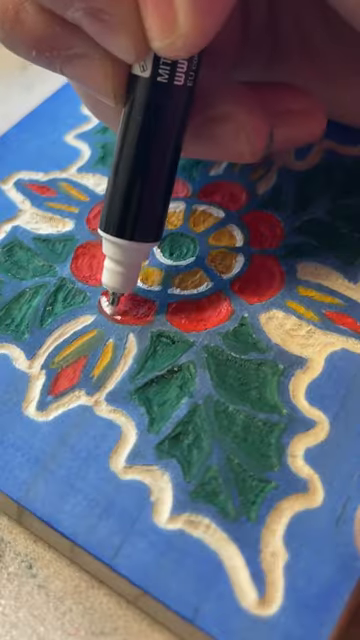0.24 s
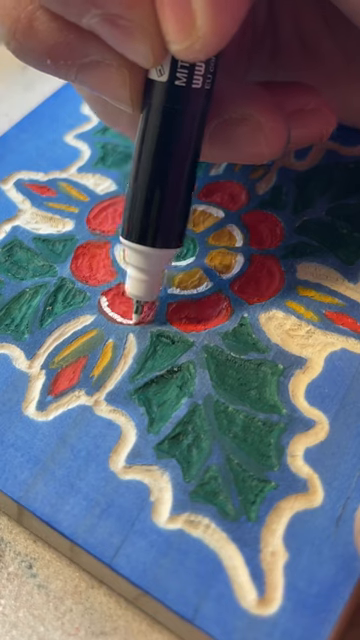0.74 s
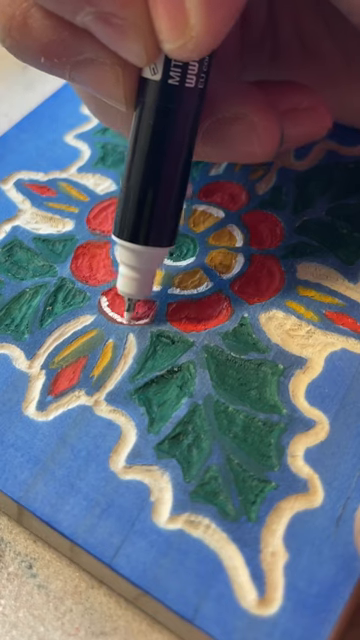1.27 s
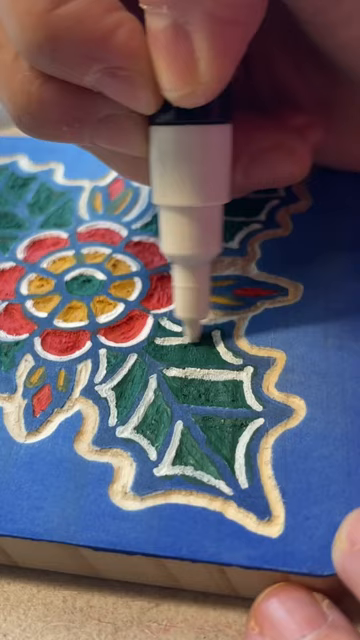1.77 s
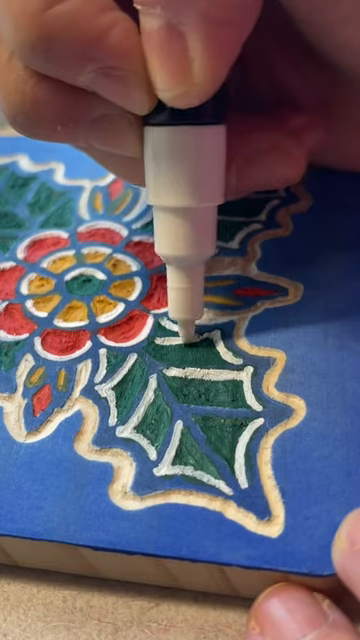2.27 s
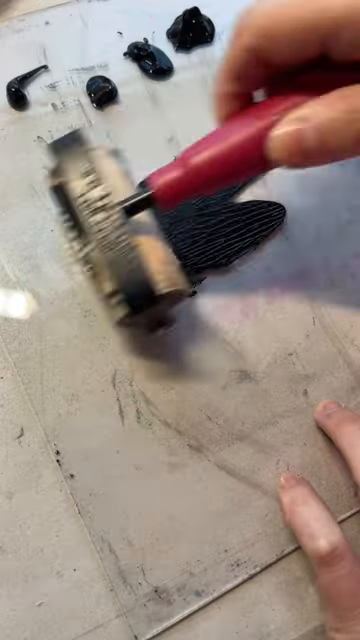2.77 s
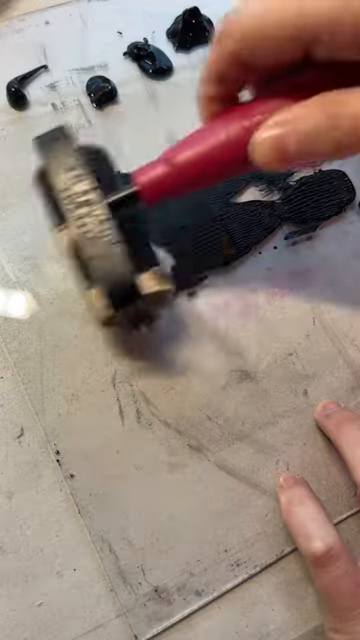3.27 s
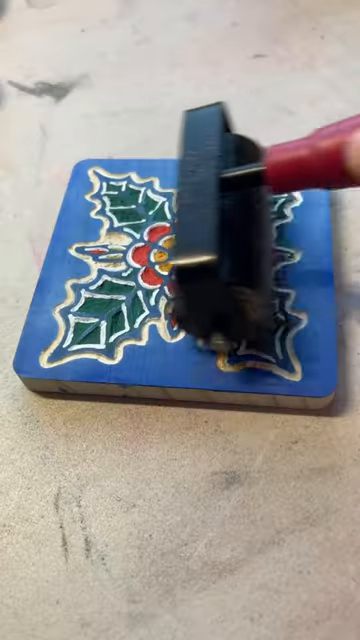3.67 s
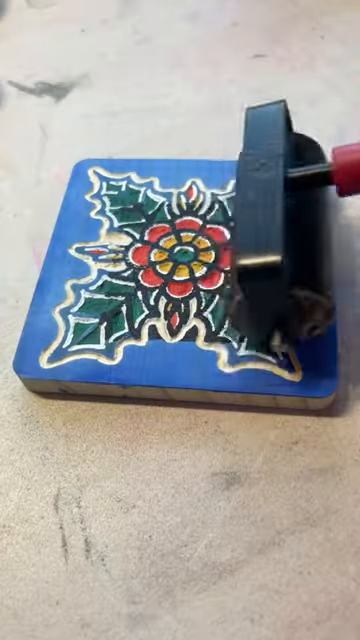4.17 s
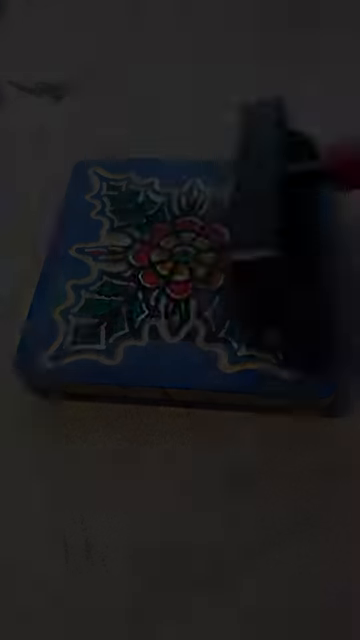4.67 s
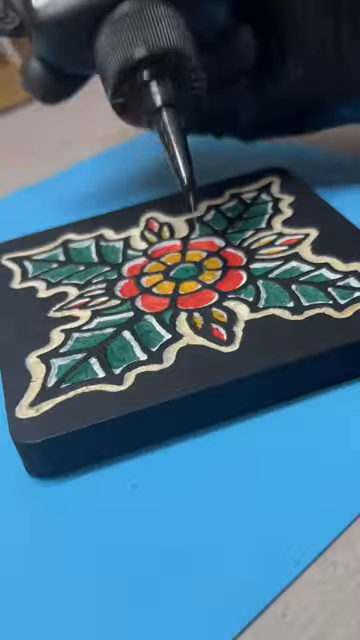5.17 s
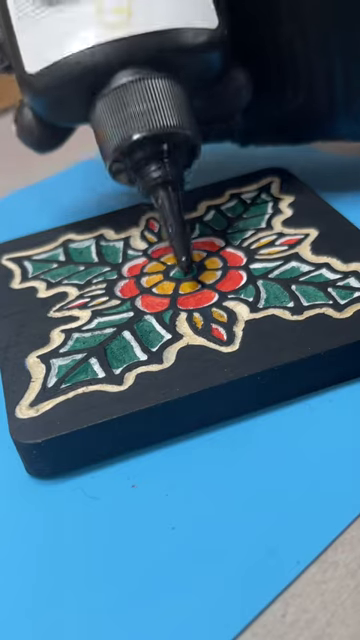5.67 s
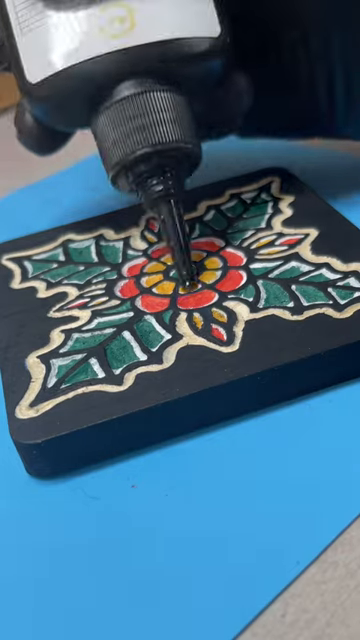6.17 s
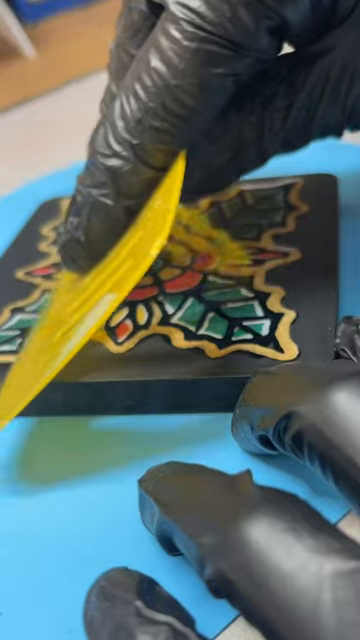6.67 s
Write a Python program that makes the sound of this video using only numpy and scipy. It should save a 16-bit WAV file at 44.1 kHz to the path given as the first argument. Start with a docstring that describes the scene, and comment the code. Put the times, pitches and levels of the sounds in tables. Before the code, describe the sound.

A pen nib ticks and scrapes on carved wood, a roller crackles through tacky ink and drums to and fro, then cloth rubs wood.

```python
"""A paint pen ticks and scrapes in the grooves of a carved wooden block, over a low indoor rumble.
Then a rubber roller crackles through tacky ink on a slab and rolls to and fro over the block, drumming on the wood.
A bottle nozzle taps the block and a cloth rubs it to the end. Noise grains shaped by spectra give the friction and
tearing; damped sines give the ringing wood, pen and ink. Two closely spaced microphone ports hear it all."""
import sys
import numpy as np
from scipy import signal
from scipy.fft import rfft, irfft
from scipy.io import wavfile
from scipy.ndimage import uniform_filter1d

SR = 44100
rng = np.random.default_rng(int(sys.argv[2]) if len(sys.argv) > 2 else 0)


def master(y):
    """Save y as 16-bit WAV."""
    cut = np.clip(np.atleast_2d(y).T, -1, 1)
    pcm = np.round(cut * 32767)  # scale
    wavfile.write(sys.argv[1], SR, pcm.astype(np.int16))


N = 305172
T = np.arange(N) / SR
FREQS = np.arange(N + 1) * SR / (2 * N)

# All levels below are relative: each source, the room and the ports apply gains of their own.
# background spectra before and after the switch: (frequency [Hz], level [dB])
EARLY_ROOM = [(20, -37.5), (48, 2.5), (75, -2.5), (115, -3), (200, -11), (310, -12), (550, -22),
              (1200, -31.5), (1500, -40.5), (2300, -40), (2800, -49), (3600, -52), (10500, -55),
              (13000, -67), (16000, -72)]
LATE_ROOM = [(20, -29.5), (48, 6.5), (90, 1.5), (135, -1.5), (230, -7.5), (340, -12.5), (550, -28),
             (900, -41), (1800, -45.5), (4000, -48.5), (10500, -46.5), (13000, -60.5), (16000, -66)]
# wavering hums before and after the switch: (frequency [Hz], level [dB])
EARLY_HUM = [(119.6, -58), (301, -61.5), (387, -73), (806, -80)]
LATE_HUM = [(66, -60), (137, -59.5), (205, -69), (335, -69.5)]
# how unlike the two ports hear the background: (frequency [Hz], side minus mid [dB])
ROOM_WIDTH = [(60, -22.5), (130, -23), (280, -5), (570, 4), (1200, 0.5), (2500, -9.5), (11000, -20)]
BACKGROUND_SWITCH_S = 2.805

# pen nib catching on ridges of the carving: (time [s], tick level [dB], thud level [dB])
NIB_TICKS = [(0.024, -46, -43), (0.0433, -40, -57), (0.115, -54, -65), (0.1995, -55.5, -45.5),
             (0.2399, -39.5, -47), (0.2443, -44, -46.5), (0.3104, -47, -46), (0.3281, -35.5, -50),
             (0.3595, -35, -53), (0.3903, -36, -55), (0.3955, -42.5, -46), (0.4334, -49, -49),
             (0.4427, -44, -61), (0.5202, -27.5, -39), (0.603, -42, -41), (1.238, -64, -71),
             (1.8075, -42.5, -46.5), (2.176, -33, -44.5), (2.1876, -38, -42.5), (2.2053, -43, -44),
             (2.2381, -33.5, -62), (2.2803, -40.5, -60), (2.2837, -34, -41.5), (2.3405, -48, -56),
             (2.5539, -40.5, -50)]
# pen nib dragging: (time [s], length [s], level [dB])
SCRAPES = [(1.805, 0.043, -57), (1.885, 0.028, -72), (1.98, 0.035, -74), (2.172, 0.021, -56.5),
           (2.195, 0.028, -66), (2.279, 0.017, -61), (2.318, 0.044, -59.5), (2.552, 0.045, -73.5)]
# spectra of the fine pen on the petals and the thicker one on the leaves: (frequency [Hz], level [dB])
FINE_PEN_COLOUR = [(700, -7), (1500, -20), (2500, -3.5), (3600, -4.5), (4300, -5), (7000, 2.5),
                   (8500, -1.5), (10700, 5), (11800, -25.5), (14000, -45)]
THICK_PEN_COLOUR = [(600, 2.5), (1400, -39), (2200, -1), (3400, -13), (4500, 1.5), (5200, -1.5),
                    (5900, -2.5), (8300, -5.5), (10900, -4), (11800, -34), (14000, -39)]
# hollow tock of the block under the nib: (frequency [Hz], level [dB])
TOCK_COLOUR = [(200, 1.5), (330, 3), (520, 2), (750, -7), (1100, -9.5), (2000, -26), (5000, -48)]
PEN_CHANGE_S = 1.79  # from petals to leaves
BARREL_HZ, BARREL_DECAY_S = 6060, 0.00041
HOLLOW_HZ, HOLLOW_DECAY_S, HOLLOW_DB = 260, 0.0034, -6.5  # the block's hollow note, relative to the thud
BASS_EDGE_HZ = 63  # the wood radiates little below this

# modes of the table under the slab and of the block on it: (frequency [Hz], level [dB], t60 [s])
TABLE_MODES = [(55.5, -17, 0.12), (114.7, 4.5, 0.3), (141.5, -2, 0.36), (178.4, -9, 0.24),
               (235, -10.5, 0.12), (318, -8, 0.45), (377, -12, 0.053), (473, -26.5, 0.094),
               (586, -38.5, 0.079)]
BLOCK_MODES = [(84, -8, 0.11), (117.6, 0, 0.27), (132.5, 2, 0.27), (177, -10.5, 0.27), (234, -21, 0.13),
               (304, -18.5, 0.24), (440, -23.5, 0.17), (646, -32, 0.18)]

# roller strokes, to and fro: (time [s], length [s], speeding up [s], slowing down [s],
# ink crackle level [dB], wood rumble level [dB])
STROKES = [(2.805, 0.23, 0.0046, 0.12, -61.5, -42.5), (3.08, 0.22, 0.065, 0.155, -57, -38.5),
           (3.3, 0.22, 0.11, 0.083, -57, -40), (3.52, 0.087, 0.08, 0.011, -53.5, -37.5),
           (3.58, 0.35, 0.18, 0.092, -64.5, -42.5), (3.935, 0.28, 0.15, 0.13, -62, -35.5),
           (4.21, 0.28, 0.11, 0.097, -59.5, -40), (4.49, 0.25, 0.12, 0.12, -57.5, -33.5)]
# abrupt low thump as the background switches, and the first knock as the rolling begins: (time [s], thump level
# [dB], thump decay [s], # thud level [dB], boom [Hz], ink squelch level [dB])
ROLLING_ONSET = (2.8055, -28, .005, -25.5, 102.5, -44.5)
# roller dropping over a ridge: (time [s], thud level [dB], boom [Hz])
BUMPS = [(3.194, -25, 122.7), (3.374, -25.5, 115), (3.585, -34.5, 119), (3.974, -33.5, 138),
         (4.058, -27, 123.5), (4.341, -26, 113.6), (4.537, -31, 140.7), (4.604, -24.5, 135.5)]
# larger ink threads snapping behind the roller: (time [s], level [dB], ring [Hz])
SNAPS = [(2.853, -41, 10760), (2.9565, -34.5, 3420), (3.1001, -38.5, 7050), (3.1259, -38, 11000),
         (3.1592, -36.5, 10600), (3.174, -40, 1570), (3.197, -41, 10640), (3.2883, -49.5, 10500),
         (3.357, -44.5, 10800), (3.545, -45.5, 6400), (3.5836, -40, 1810), (3.602, -42.5, 5780),
         (3.681, -35, 10500), (3.72, -33.5, 10200), (4.158, -44.5, 7000), (4.2971, -34.5, 10800),
         (4.3242, -29.5, 10840), (4.6243, -30.5, 10140)]
# spectra of ink crackle on slab and block, and of single snaps: (frequency [Hz], level [dB])
SLAB_COLOUR = [(600, -2.5), (1000, -19), (1600, -2.5), (2300, -3), (3000, -5.5), (4000, -9), (6500, -1),
               (9000, 2.5), (10500, 7.5), (11500, -2.5), (12500, -42), (15500, -16)]
BLOCK_COLOUR = [(600, -5.5), (1000, -23), (1800, -22.5), (2600, -17), (3800, -20), (6000, -13),
                (9000, -4.5), (10300, 2.5), (11300, -6), (12500, -45), (15500, -30)]
SNAP_COLOUR = [(700, -15), (1800, -18.5), (4000, -14.5), (7000, -11.5), (10500, -2), (11800, -13),
               (13000, -39), (15500, -24)]
BLOCK_START_S = 3.56  # the roller moves from slab to block
CRACKLE_POWER, RUMBLE_POWER = 1.9, 2.02  # amplitude grows with these powers of roller speed
CREEP = 0.057  # least speed within a stroke, as a share of full speed
THICK_INK_SPREAD_DB = 3.2  # spread of sizes among the threads on the slab
THICK_SNAP_S, THIN_SNAP_S = 0.0029, 0.00061  # thick ink on the slab lets go more slowly

# single sharp, dry click: (time [s], level [dB])
DRY_CLICK = (4.7385, -34)
# its spectrum: (frequency [Hz], level [dB])
CLICK_COLOUR = [(300, -7), (1200, -11), (6000, -26), (13000, -39)]

# bottle being squeezed, and the glove shifting on it: (time [s], length [s], level [dB])
SQUEEZES = [(4.795, 0.046, -74), (5.78, 0.042, -73.5)]
GRIPS = [(5.76, 0.14, -58.5)]
# nozzle tapping the block: (time [s], knock level [dB], click level [dB])
TAP = (6.147, -38.5, -36)
# spectrum of the nozzle's click: (frequency [Hz], level [dB])
NOZZLE_COLOUR = [(110, 7), (220, 4.5), (350, 6), (600, 2), (1000, -5), (1500, -29), (2200, -22),
                 (2800, -27), (4300, -10.5), (5800, -26), (7400, -18), (11000, -16), (13000, -68)]
# glove squeaking faintly on the bottle: (time [s], length [s], level [dB], start [Hz], rise [Hz/s])
SQUEAK = (5.25, 0.11, -83, 4350, 5000)

# spectrum of cloth on wood: (frequency [Hz], level [dB])
CLOTH_COLOUR = [(30, -40), (70, -7), (90, 5.5), (125, 7.5), (170, -3.5), (225, -9), (300, -2), (450, -13),
                (500, -9.5), (570, -20.5), (780, -24), (1000, -33), (1800, -36), (2300, -34), (3400, -43),
                (6500, -39.5), (10800, -38.5), (11800, -73), (15000, -94)]
# glove crinkling: (time [s], length [s], level [dB])
CRINKLES = [(6.728, 0.0089, -53)]
RUB_START_S, RUB_DB, RUB_ATTACK_S = 6.574, -37.7, 0.0055

# what the room gives back, most in the low and middle range: (frequency [Hz], level [dB])
ECHO_COLOUR = [(80, -30.5), (300, -7), (700, -2.5), (2200, -10.5), (6000, -15.5), (12000, -20)]
# how far the right port trails the left: (frequency [Hz], phase lag [rad])
PORT_PHASE = [(1800, 0.0), (3000, 1.0), (4000, 1.1), (4600, 2.1), (5200, 4.9), (5700, 6.1), (6400, 6.8),
              (8400, 9.0), (9400, 9.6), (11800, 12.4), (13800, 12.6), (15200, 15.5)]
TOP_HZ = 15800


def undb(db):
    """Definition of level: decibels to amplitude gain."""
    return 10 ** (np.asarray(db) / 20)


def gains(points):
    """Spectral envelope: points joined in dB over log frequency, falling steeply below the first."""
    hz, db = np.transpose(points)
    envelope = undb(np.interp(np.log(FREQS + 1), np.log(hz), db))
    return envelope * np.minimum(FREQS / hz[0] + 0.0061, 1) ** 2


def response(points, size=4096):
    """Minimum phase: folding the cepstrum gives a causal impulse response, here of unit energy."""
    cepstrum = irfft(np.log(gains(points)))
    cepstrum[1:N] *= 2
    cepstrum[N + 1:] = 0
    h = irfft(np.exp(rfft(cepstrum)))[:size]
    return h / np.linalg.norm(h)


def colour(x, points):
    """Source and filter: x excites a body with the given spectrum."""
    return signal.oaconvolve(x, response(points))[:N]


def steady(x, window_s):
    """Power normalisation: the running rms of x is held near 1."""
    power = np.abs(uniform_filter1d(x ** 2, int(window_s * SR) + 1))
    return x / np.sqrt(power + 1e-12)


def waver(hold_s):
    """Low-passed noise: a smooth random drift of spread 1 that changes about every hold_s."""
    noise = uniform_filter1d(rng.standard_normal(N), int(hold_s * SR) + 1)
    return steady(uniform_filter1d(noise, int(hold_s * SR / 2) + 1), 2.2)


def grains(per_s, spread_db):
    """Shot noise: randomly timed micro-clicks, many small and a few large."""
    size = undb(spread_db * np.minimum(rng.exponential(size=N), 6))
    happens = rng.random(N) < per_s / SR
    return steady(happens * size * rng.standard_normal(N), 0.018)


def swells(rows):
    """Amplitude modulation: half-sine gains for gestures (time [s], length [s], level [dB])."""
    return sum(undb(db) * np.sin(np.pi * np.clip((T - s) / length, 0, 1)) for s, length, db in rows)


def add(out, s, x):
    """Superposition: mix x into out at time s."""
    i = int(s * SR)
    out[i:i + len(x)] += x[:N - i]


def split(rows, s):
    """Order in time: the events before s and those from s on."""
    return [row for row in rows if row[0] < s], [row for row in rows if row[0] >= s]


def crack(db, decay_s, size=2048):
    """Stick-slip: one slip followed by exponentially dying micro-slips."""
    burst = rng.standard_normal(size) * np.exp(-T[:size] / decay_s)
    return undb(db) * burst * np.sqrt(decay_s * SR / 2) / np.linalg.norm(burst)


def clicks(rows, decay_s):
    """Impulsive excitation: a crack at each (time [s], level [dB])."""
    out = np.zeros(N)
    for s, db in rows:
        add(out, s, crack(db, decay_s))
    return out


def pings(rows, decay_s, size=2048):
    """Damped resonance: a brief swelling and dying sine at each (time [s], level [dB], pitch [Hz])."""
    t, out = T[:size], np.zeros(N)
    envelope = t / decay_s * np.exp(1 - t / decay_s)  # peaks at 1 after decay_s
    for s, db, hz in rows:
        add(out, s, undb(db) * envelope * np.sin(2 * np.pi * hz * t))
    return out


def ring(modes, size=16384):
    """Modal superposition: free ringing of wood after a push, peak 1."""
    t = T[:size]
    h = sum(undb(db) * np.sin(2 * np.pi * hz * t) * np.exp(-np.log(1000) * t / t60) for hz, db, t60 in modes)
    return h / np.abs(h).max()


def knocks(rows, modes):
    """Modal excitation: each blow (time [s], level [dB]) pushes the wood down and lets its modes ring."""
    out, h = np.zeros(N), ring(modes)
    for s, db in rows:
        add(out, s, -undb(db) * h)
    return out


def radiate(x):
    """Radiation efficiency: a small board gives off little deep bass."""
    return signal.sosfilt(signal.butter(2, BASS_EDGE_HZ, "high", fs=SR, output="sos"), x)


def soften(x, corner_hz):
    """Low-pass filtering, as by a soft contact: only the lower frequencies pass."""
    return signal.sosfilt(signal.butter(4, corner_hz, fs=SR, output="sos"), x)


def background(points, hums, level_db):
    """Spatial coherence: a rumble alike at both ports in the bass, diffuse above, with wavering hums."""
    mid = colour(rng.standard_normal(N), points)
    side = colour(rng.standard_normal(N), points)
    side = irfft(rfft(side, 2 * N) * gains(ROOM_WIDTH))[:N]
    rumble = undb(level_db) * np.array([undb(-1.0) * (mid + side), mid - side])
    hum = np.zeros(N)
    for hz, db in hums:
        strength = undb(db) * (1 + 0.7 * waver(0.034))
        hum += strength * np.sin(2 * np.pi * hz * T + 0.78 * waver(0.079))
    return rumble + hum


def pen(ticks, points, tick_db, ring_db, thud_db, tock_db, decay_s, drag=0):
    """Stick-slip over a ridge: a click and brief ring in the pen, a hollow tock in the block, a table thud."""
    s, db, thud = np.transpose(ticks)
    slips = clicks(zip(s, db + tick_db), decay_s) + drag
    barrel = pings([(when, level + ring_db, BARREL_HZ) for when, level in zip(s, db)], BARREL_DECAY_S)
    hollow = pings([(when, level + HOLLOW_DB, HOLLOW_HZ) for when, level in zip(s, thud)], HOLLOW_DECAY_S)
    tock = undb(tock_db) * colour(slips, TOCK_COLOUR) - hollow
    table = radiate(knocks(zip(s, thud + thud_db), TABLE_MODES))
    return colour(slips, points) + barrel + tock + table


def stroke(start_s, length_s, up_s, down_s):
    """Kinematics: roller speed from 0 to 1 as the hand eases into a stroke, holds its pace and eases out."""
    rise = np.sin(np.pi / 2 * np.clip((T - start_s) / up_s, 0, 1))
    fall = np.sin(np.pi / 2 * np.clip((start_s + length_s - T) / down_s, 0, 1))
    moving = (T > start_s) * (T < start_s + length_s)
    return (CREEP + (1 - CREEP) * rise * fall) * moving


def tearing(strokes):
    """Power law of speed: the faster the roller, the harder the ink is torn."""
    return sum(undb(db) * stroke(*motion) ** CRACKLE_POWER for *motion, db, _ in strokes)


def roller(strokes, points, modes, per_s, spread_db, patchy_db, ink_db, rumble_db, rubber_hz):
    """Adhesive rupture and forced vibration: ink tears in patches, uneven rubber drums; both follow speed."""
    threads = grains(per_s, spread_db) * undb(patchy_db * waver(0.013))
    tack = colour(threads * tearing(strokes), points)
    rolling = sum(undb(db) * stroke(*motion) ** RUMBLE_POWER for *motion, _, db in strokes)
    shaken_wood = signal.oaconvolve(grains(700, 1.3), ring(modes))[:N]
    drumming = steady(radiate(shaken_wood), 0.039) * rolling
    return undb(ink_db) * tack + undb(rumble_db) * soften(drumming, rubber_hz)


def ink_bubbles(strokes, level_db, centre_hz, count=260):
    """Bubble resonance: air pockets in thick ink pop with a few cycles each, louder with roller speed."""
    when, size, pitch = rng.random((count, 3)).T
    first, last = strokes[0], strokes[-1]
    s = first[0] + when * (last[0] + last[1] - first[0])
    hz = centre_hz * 2 ** (pitch - .5)  # within half an octave either way
    pops = pings(zip(s, level_db - 16 * size, hz), decay_s=0.001)
    return pops * tearing(strokes)


def thump(size=4096):
    """Exponential step and damped sine: an abrupt low thump with a slow, deep sway, just as the background
    switches."""
    s, db, decay_s = ROLLING_ONSET[:3]
    out = pings([(s + decay_s, db - 16, 38)], decay_s=.018, size=size)
    add(out, s, -undb(db) * np.exp(-T[:size] / decay_s))
    return soften(out, corner_hz=795)


def roller_knocks():
    """Impact excitation: the first knock and each bump boom and ring the wood; the first also squelches."""
    s, _, _, thud_db, boom_hz, squelch_db = ROLLING_ONSET
    bumps = [(s, thud_db, boom_hz)] + list(BUMPS)
    on_slab, on_block = split([row[:2] for row in bumps], BLOCK_START_S)
    booms = undb(-1.5) * pings(bumps, decay_s=.011, size=4096)
    ringing = knocks(on_slab, TABLE_MODES) + knocks(on_block, BLOCK_MODES)
    wood = undb(-6.0) * soften(ringing, corner_hz=1100)
    squelch = colour(clicks([(s, squelch_db)], decay_s=0.026), SNAP_COLOUR)
    return booms + wood + squelch


def ink_snaps():
    """Release of tension: single snaps ring briefly above the crackle; thick ink also jolts the surface."""
    on_slab, on_block = split([(s, db - 4.5) for s, db, _ in SNAPS], BLOCK_START_S)
    thick, thin = clicks(on_slab, THICK_SNAP_S), clicks(on_block, THIN_SNAP_S)
    jolts = undb(-6) * colour(thick, TOCK_COLOUR)
    rings = undb(-4.5) * pings(SNAPS, decay_s=0.00052)
    return colour(thick + thin, SNAP_COLOUR) + jolts + rings


def dry_click():
    """Impulse response: a single sharp, dry click."""
    s, db = DRY_CLICK
    out = np.zeros(N)
    add(out, s, undb(db) * response(CLICK_COLOUR))
    return out


def bottle():
    """Friction and impact: faint fizz at each squeeze, a soft rub of the glove, one tap of the nozzle."""
    s, knock_db, click_db = TAP
    fizz = colour(grains(2100, 2.1) * swells(SQUEEZES), SNAP_COLOUR)
    grip = colour(grains(4100, 0.91) * swells(GRIPS), CLOTH_COLOUR)
    knock = knocks([(s, knock_db)], BLOCK_MODES)
    click = colour(clicks([(s, click_db)], decay_s=0.003), NOZZLE_COLOUR)
    return fizz + grip + knock + click


def squeak():
    """Frequency modulation: a thin, unsteady tone rises in pitch, its phase the integral of frequency."""
    s, length, db, hz, rise = SQUEAK
    pitch = (hz + rise * np.clip(T - s, 0, length)) * (1 + 0.018 * waver(0.004))
    return swells([(s, length, db)]) * np.sin(2 * np.pi * np.cumsum(pitch) / SR)


def cloth():
    """Dry friction: countless fibres catch on the carving under an even pressure; the glove crinkles."""
    pressure = undb(RUB_DB) * np.clip((T - RUB_START_S) / RUB_ATTACK_S, 0, 1)
    catches = grains(6000, 1.65) * undb(1.4 * waver(0.016))
    fibres = steady(colour(catches, CLOTH_COLOUR), 0.047)
    crinkle = colour(grains(4000, 3.5) * swells(CRINKLES), FINE_PEN_COLOUR)
    return pressure * fibres + crinkle


def room(x, t60_s, size=16384):
    """Diffuse reverberation: a short exponential tail, partly different at each port."""
    t = T[:size]
    decay = np.exp(-np.log(1000) * t / t60_s) * (t > .002)
    shared, apart = rng.standard_normal((2, size)) * decay
    echo = irfft(rfft(x, 2 * N) * gains(ECHO_COLOUR))[:N]
    tails = shared + 1.02 * apart, shared - 0.42 * apart
    return np.array([x + signal.oaconvolve(echo, h / np.linalg.norm(h))[:N] for h in tails])


def scene():
    """Superposition: pen, roller, bottle and cloth in turn, over a rumble that switches spectrum once."""
    on_petals, on_leaves = split(NIB_TICKS, PEN_CHANGE_S)
    petals = pen(on_petals, FINE_PEN_COLOUR, tick_db=-4.2, ring_db=-12, thud_db=2, tock_db=-8, decay_s=0.0016)
    scraping = grains(2500, 3.6) * swells(SCRAPES)
    leaves = pen(on_leaves, THICK_PEN_COLOUR, tick_db=-6, ring_db=-10.5, thud_db=6.0, tock_db=-6.5,
                 decay_s=0.0023, drag=scraping)
    leaves = leaves + colour(scraping, TOCK_COLOUR)  # a dragging nib presses harder on the wood
    on_slab, on_block = split(STROKES, BLOCK_START_S)
    slab = roller(on_slab, SLAB_COLOUR, TABLE_MODES, per_s=1900, spread_db=THICK_INK_SPREAD_DB,
                  patchy_db=3.5, ink_db=4.0, rumble_db=-2.0, rubber_hz=630)
    slab = slab + ink_bubbles(on_slab, level_db=-0.5, centre_hz=1926)
    block = roller(on_block, BLOCK_COLOUR, BLOCK_MODES, per_s=9300, spread_db=3.0,
                   patchy_db=2.0, ink_db=6.0, rumble_db=-1.0, rubber_hz=640)
    work = petals + leaves + slab + block + roller_knocks() + ink_snaps() + bottle() + squeak() + cloth()
    early = background(EARLY_ROOM, EARLY_HUM, level_db=-53)
    late = background(LATE_ROOM, LATE_HUM, level_db=-55)
    rumble = np.where(T < BACKGROUND_SWITCH_S, early, late)
    return room(work, t60_s=0.16) + thump() + dry_click() + rumble  # thump and click get no echo


def record(dry):
    """Phase lag between ports: the right trails in the treble and is a little louder; the top is cut."""
    hz, radians = np.transpose(PORT_PHASE)
    lag = np.exp(-1j * np.interp(FREQS, hz, radians))
    right = irfft(rfft(dry[1], 2 * N) * lag)[:N]
    ports = np.array([undb(0.34) * dry[0], undb(1.0) * right])
    return signal.sosfilt(signal.ellip(8, .2, 70, TOP_HZ, fs=SR, output="sos"), ports)


dry = scene()
out = record(dry)
master(out)
```